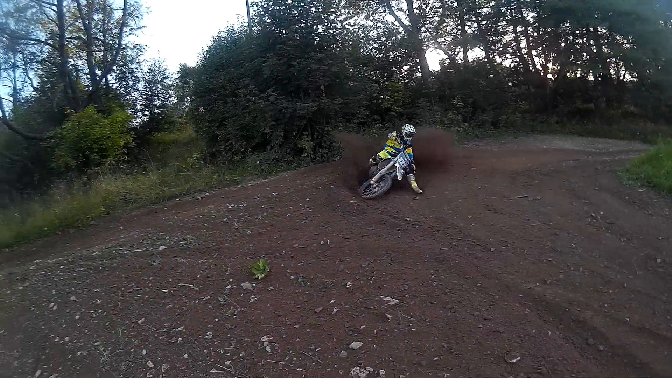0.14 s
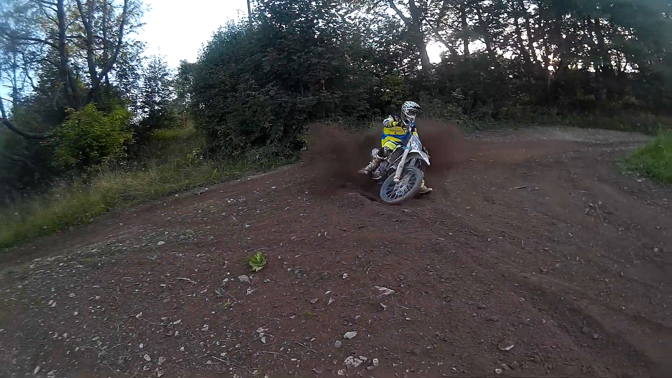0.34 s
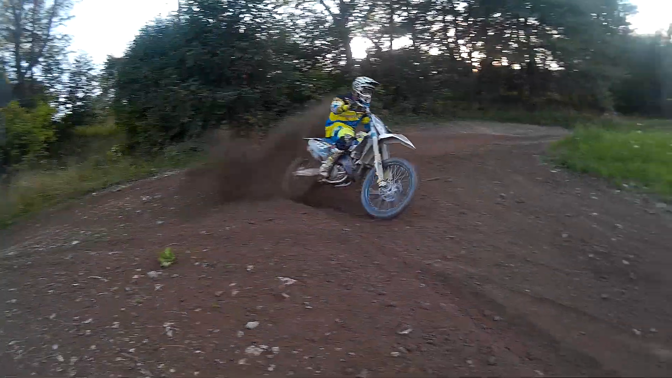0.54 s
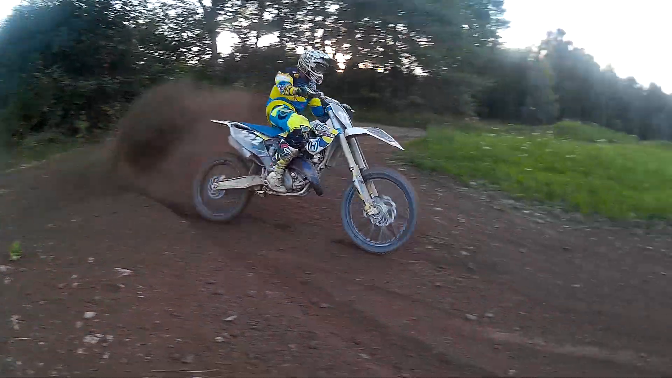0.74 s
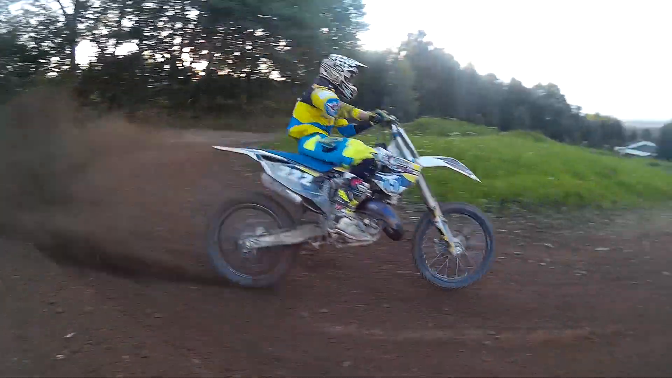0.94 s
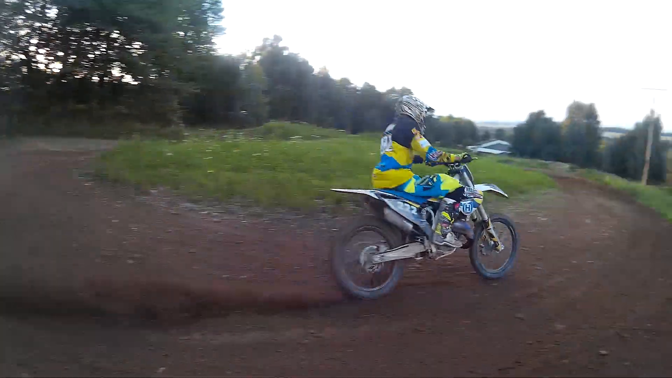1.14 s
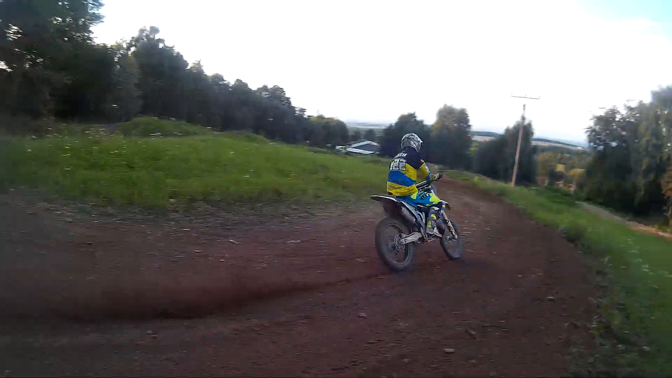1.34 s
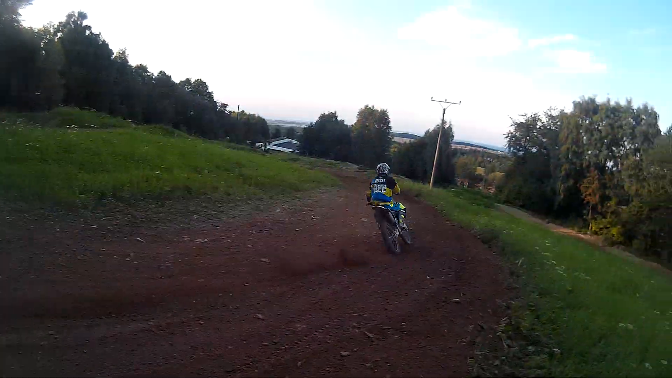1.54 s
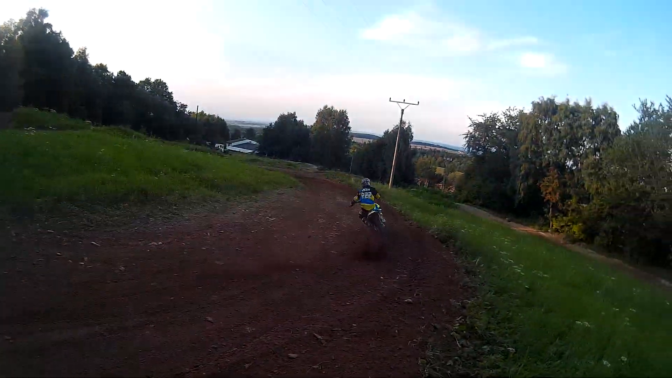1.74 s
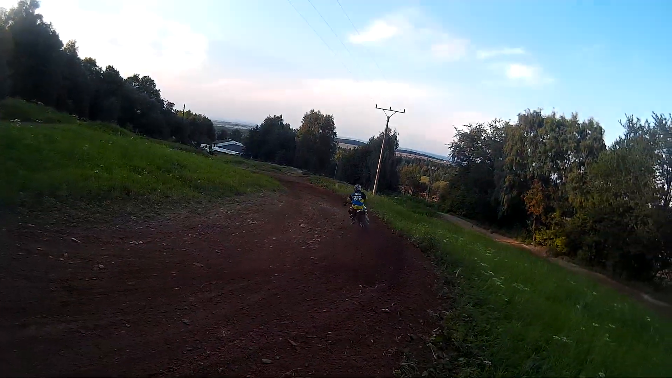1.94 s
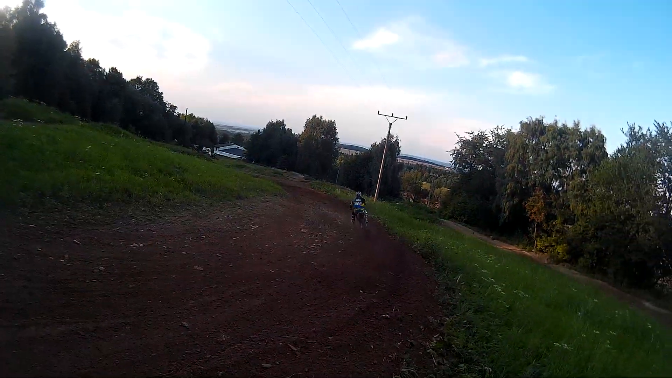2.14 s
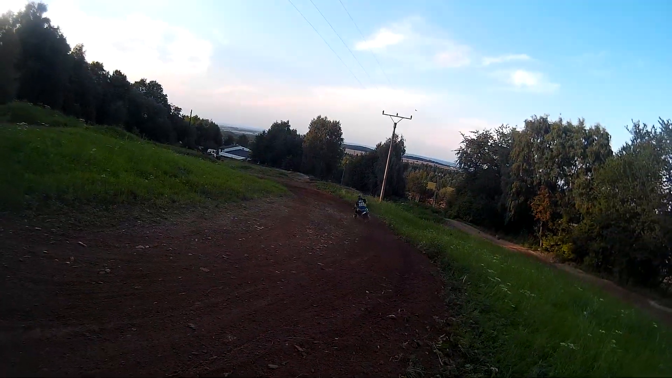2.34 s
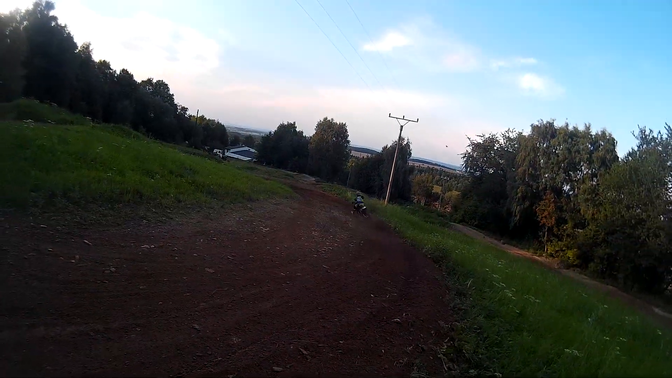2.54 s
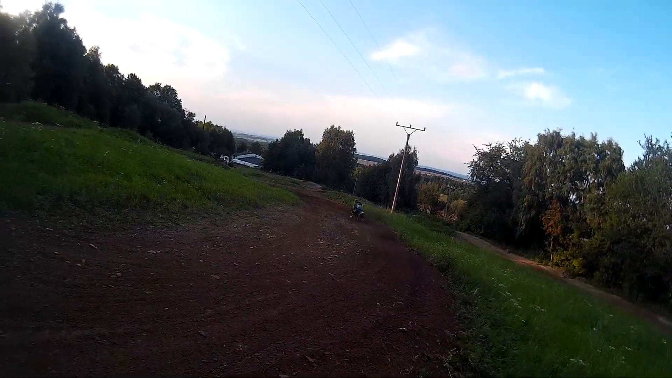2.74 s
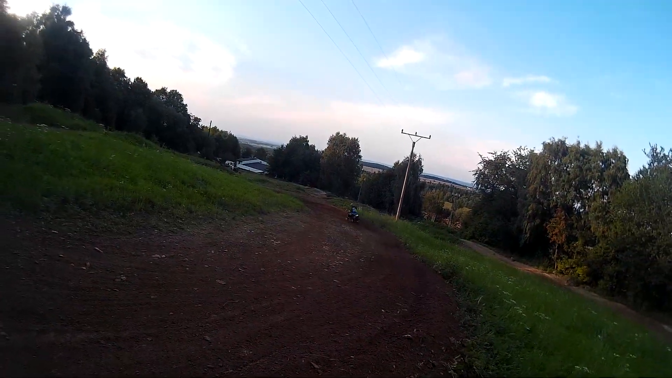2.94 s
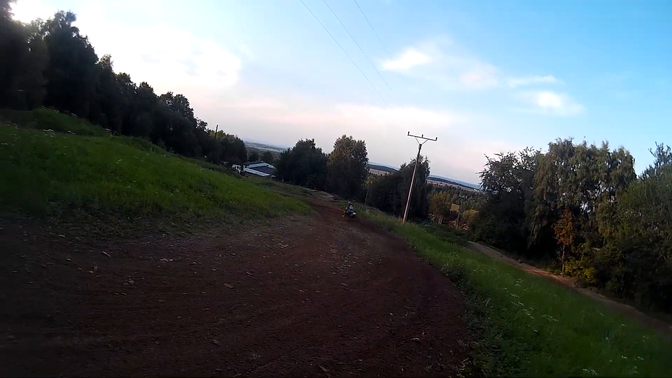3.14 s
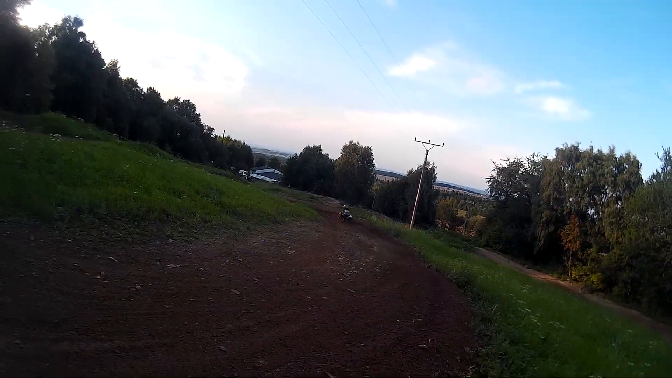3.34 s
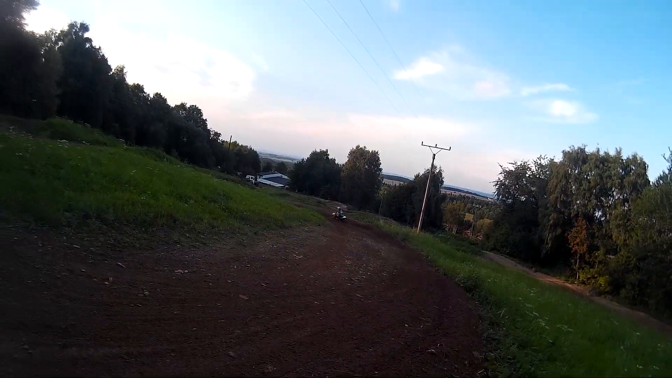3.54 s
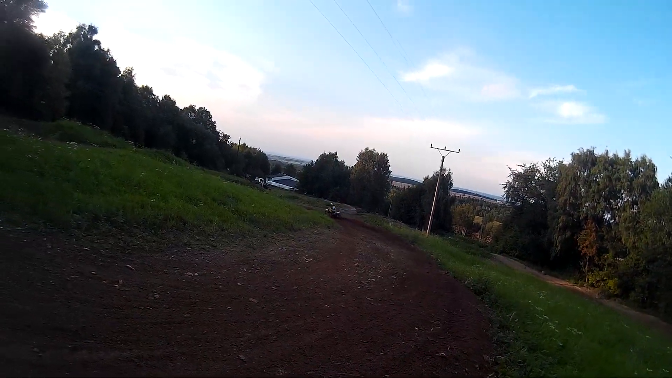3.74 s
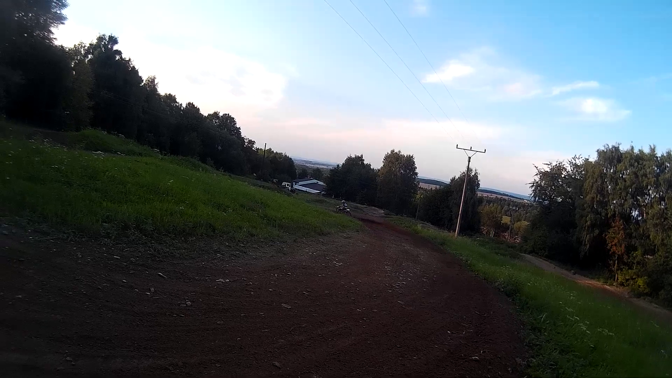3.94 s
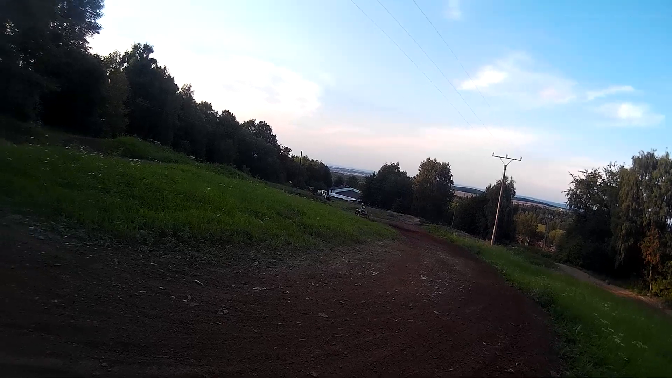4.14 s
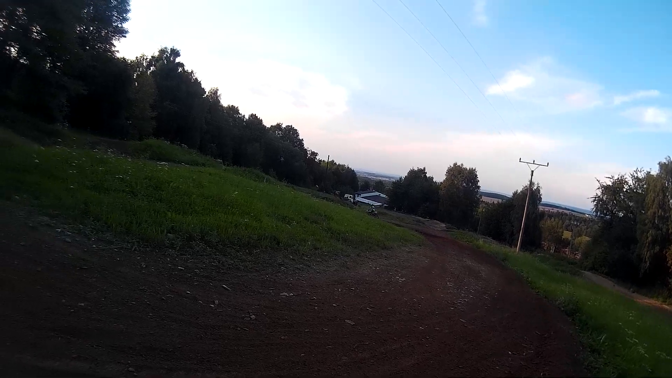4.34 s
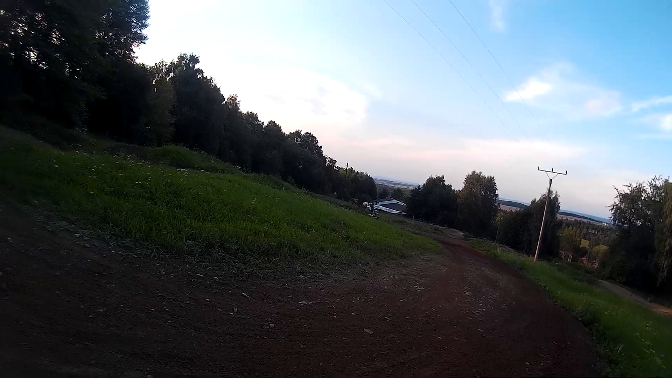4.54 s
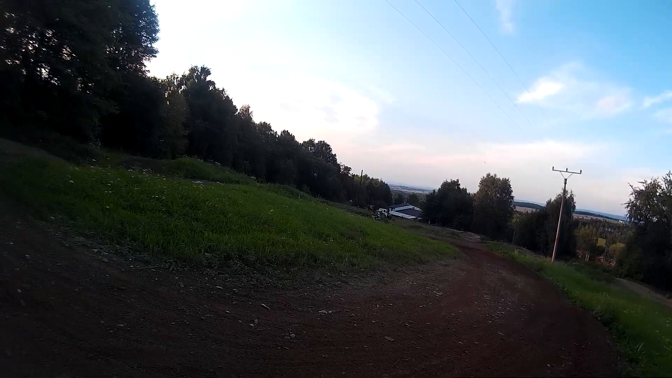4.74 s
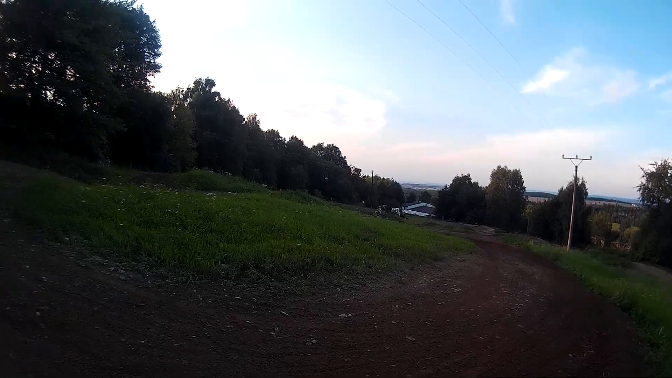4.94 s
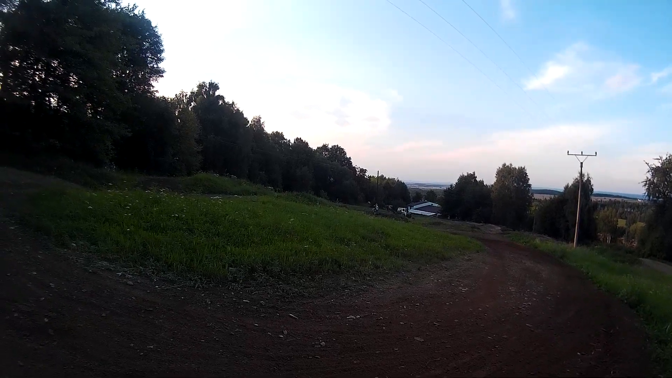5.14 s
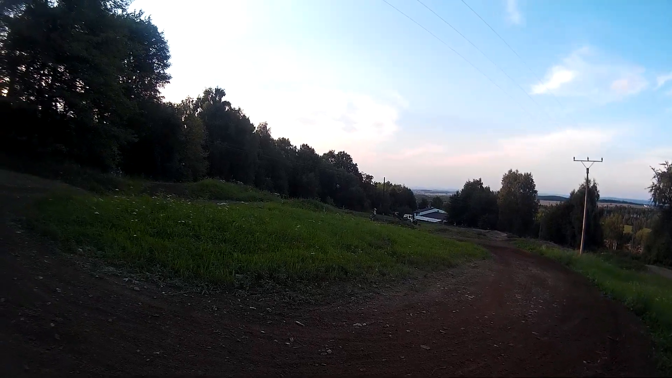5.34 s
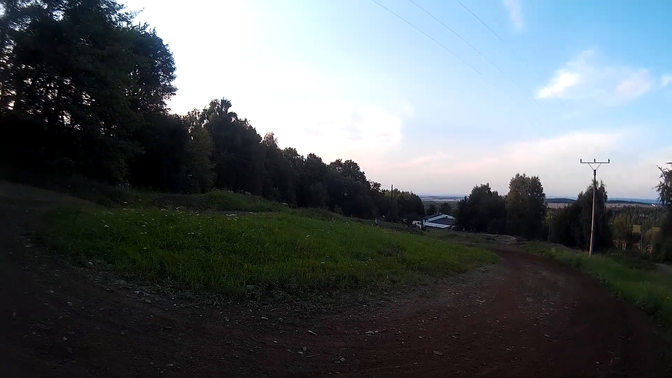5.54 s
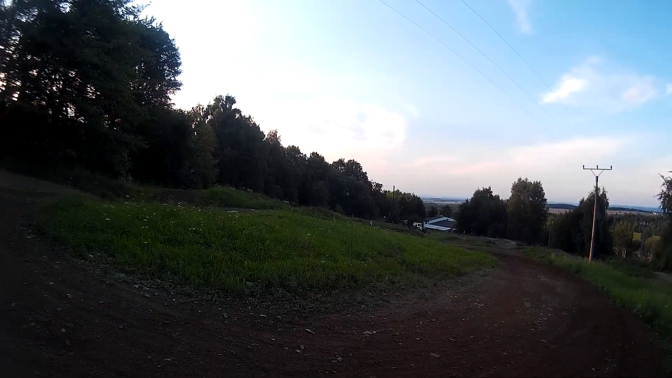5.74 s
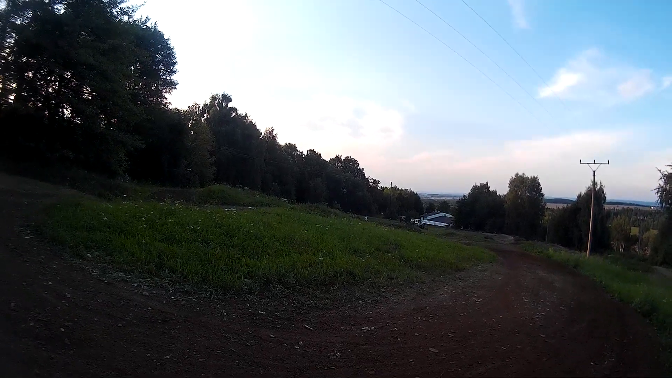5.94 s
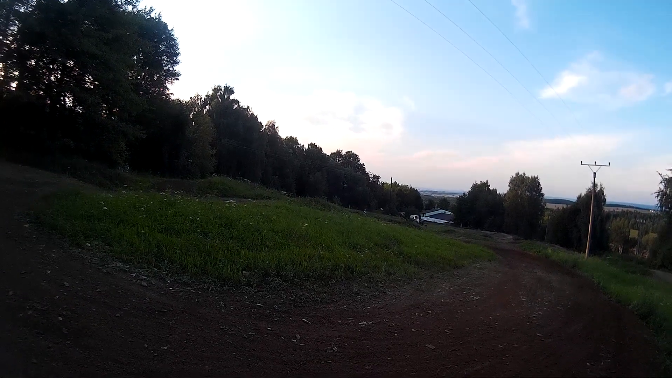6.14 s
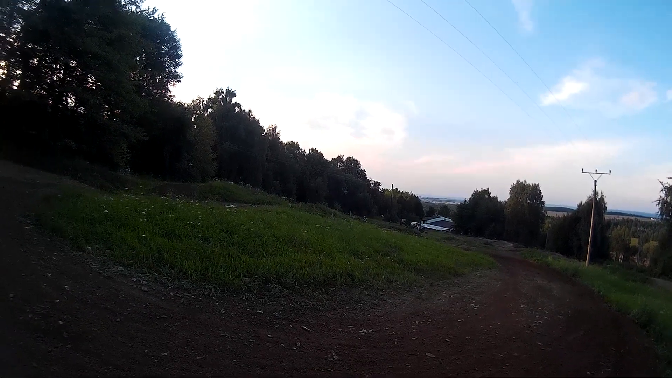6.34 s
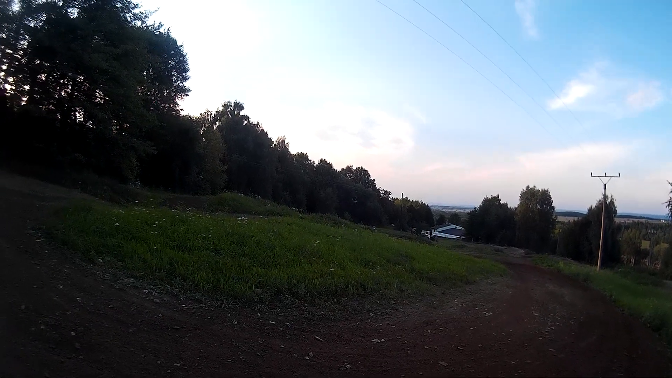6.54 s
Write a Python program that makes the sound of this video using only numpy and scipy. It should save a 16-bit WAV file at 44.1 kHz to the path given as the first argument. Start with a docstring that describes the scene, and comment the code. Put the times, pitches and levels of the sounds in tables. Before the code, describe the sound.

A single buzzing two-stroke bike powers through a corner a few metres from a fixed microphone. Tyres rumble and stones patter briefly. After the pass the ringing, nasal scream becomes a hoarser drone from behind, stuttering with quick throttle blips down the straight. It is abruptly muffled by the land, briefly resurfaces, and dies away into light wind, with a soft woodland echo.

```python
"""Motocross bike riding past

A two-stroke bike powers out of a dirt corner, passes close by and rides off downhill.
Each firing rings the expansion chamber (heard from the front) or the tailpipe (heard from behind),
and puffs of noise add rasping gas. Low tones drone along with the crank.
Noise bursts pop on the overrun, the tyres rumble and spray grit, trees answer and light wind rumbles."""
import sys
import numpy as np
from scipy import signal
from scipy.fft import rfft, irfft, next_fast_len
from scipy.io import wavfile
from scipy.ndimage import uniform_filter1d, map_coordinates

SR = 44100
rng = np.random.default_rng(int(sys.argv[2]) if len(sys.argv) > 2 else 0)


def generate_wav(sig):
    """Save sig (samples, or channels by samples) to the path in sys.argv[1] as 16-bit PCM at SR."""
    pcm = np.round(np.clip(np.atleast_2d(sig).T, -1, 1) * 32767).astype(np.int16)
    wavfile.write(sys.argv[1], SR, pcm)


N = 294588

# Crank speed through the corner and down the straight, before flutter: (time [s], firing rate [Hz])
CRANK_SPEED = [(0.0, 197.4), (0.12, 181.3), (0.25, 195.8), (0.39, 184.1), (0.49, 150.8), (0.54, 147),
               (0.62, 157.3), (0.7, 157.4), (0.74, 172.5), (0.79, 184.6), (0.84, 182.6), (0.92, 214.3),
               (0.97, 197.1), (1.15, 186.3), (1.22, 196), (1.27, 215), (1.32, 224.2), (1.38, 214.4),
               (1.42, 187.6), (1.51, 198.8), (1.53, 190), (1.61, 213), (1.67, 193.5), (1.71, 204.6),
               (1.93, 195.7), (2.0, 210.2), (2.35, 206.5), (2.39, 221.1), (2.48, 187.9), (2.62, 215.8),
               (2.74, 207.4), (2.77, 196.2), (2.89, 224.4), (2.99, 220.8), (3.04, 189), (3.12, 167.6),
               (3.16, 168.4), (3.18, 181.9), (3.31, 208.8), (3.39, 215.4), (3.44, 209.7), (3.48, 193.7),
               (3.52, 204.1), (3.77, 195.6), (3.84, 209.7), (3.95, 203.3), (4.0, 213), (4.04, 204.8),
               (4.22, 213.4), (4.25, 204.1), (4.32, 216.5), (4.4, 199.5), (4.45, 218.2), (4.48, 212.7)]
# Crank speed beyond the rise, before flutter: (time [s], firing rate [Hz])
FAR_CRANK_SPEED = [(4.57, 182.9), (4.844, 201.8), (5.37, 145.9), (5.448, 189.1), (5.528, 219.4),
                   (5.75, 210.9), (5.92, 166.8)]
# The flutter's share of the crank speed, and how many changes a second
FLUTTER, FLUTTER_PER_S = .003, 22

# The ride: (time [s], distance [m], front share [0-1], roughness [0-1], tyre rumble [dB], grit [dB])
RIDE = [(0, 13.1, 0.92, 0.5, -46, -37.5), (.7, 4.27, 0.97, 0.4, -51, -32.5),
        (1.25, 4.56, 0.21, 0.3, -46.5, -45.5), (1.7, 6.35, 0.11, 0.28, -51, -52),
        (2.5, 22.2, 0.2, 0.4, -48, -50), (4.1, 44.5, 0.04, 0.31, -48.5, -75),
        (4.9, 56, 0.36, 0.65, -67.5, -89), (6.6, 91, 0.06, 0.76, -70, -100)]
# The lie of the land hides the bike: (time [s], loss [dB])
HIDDEN_LOSS = [(4.3, 0), (4.7, 17), (4.82, 19.5), (4.97, 32), (5.3, 31), (5.37, 23), (5.49, 14), (5.83, 17),
               (6.1, 35)]

# Twists of the throttle:
# (fully open [s], starts to shut [s], time to open [s], engine load [dB], drone [dB])
THROTTLE_TWISTS = [(0, 0.353, .05, 1, 2), (0.42, .84, 0.62, 0, 1.5), (0.886, 0.931, 0.1, 1, -3.5),
                   (1.027, 1.271, 0.31, -2, -2), (1.41, 1.606, .032, 0.5, 0),
                   (1.621, 2.14, 0.09, -3.5, -1.5), (2.339, 2.375, 0.018, -6, 1.5),
                   (2.442, 2.611, 0.082, 0, 3.5), (2.808, 2.839, 0.029, -11, -4),
                   (2.887, 3, 0.13, -17.5, 1.5), (3.053, 3.058, 0.035, -5.5, -9),
                   (3.285, 3.355, .23, -0.5, 2.5), (3.516, 3.742, .06, -1.5, -1.5),
                   (3.81, 3.984, .12, 3, -0.5), (4.05, 4.29, .2, 1, 0.5), (4.425, 4.442, .04, -3.5, 1.5),
                   (4.663, 4.73, 0.072, -8.5, 0.5), (5.148, 5.2, .04, -14, -7), (5.479, 5.49, 0.14, 1, 4),
                   (5.55, 5.762, 0.049, -19.5, -3), (5.817, 5.87, 0.059, -10, 0.5)]
# Engine load with the throttle shut, and how fast the load falls to it
OVERRUN_DB, RELEASE_DB_PER_S = -19.5, 324
# The same two settings for the drone
DRONE_OVERRUN_DB, DRONE_RELEASE_DB_PER_S = -8.5, 107.5

# Base levels of the pipe's bark and the lowest drone tone, to which load and losses are added
BARK_DB, DRONE_DB = -12.5, -26.5
# Loss with each doubling of the distance
BARK_FADE_DB_PER_DOUBLING, DRONE_FADE_DB_PER_DOUBLING = 2.24, 1.72
# Below this firing rate the pipe is out of tune and the drone weakens
DRONE_HZ, DRONE_DB_PER_HZ = 182, 0.25
# Drone overtones before the load is added: (time [s], second order [dB], third order [dB])
OVERTONES = [(0, -38.5, -35), (.28, -49, -38), (.41, -36.5, -28.5), (.55, -36.5, -68), (.76, -50.5, -31.5),
             (.96, -22, -45), (1.13, -27.5, -23.5), (1.56, -35, -52.5), (2, -33, -38), (2.5, -29, -32),
             (2.8, -35, -40), (3.05, -31, -28), (3.4, -36, -56), (3.7, -37.5, -45), (4, -40.5, -68),
             (4.25, -45.5, -77), (5.8, -50.5, -49)]
# dB of the two overtones, and of rasp, per dB of load
SECOND_FOLLOWS, THIRD_FOLLOWS, RASP_FOLLOWS = .45, .8, .7
# Base level of the gas jet's rasp, before load, hiding and facing are added: (time [s], level [dB])
RASP_LEVEL = [(0, -25), (.32, -18.5), (.68, -22), (1.03, -22.5), (1.25, -25.5), (1.56, -30.5),
              (1.77, -45.5), (2.1, -37.5), (2.55, -35), (3.6, -38.5), (4.28, -35), (5.8, -36)]

# Expansion chamber resonances, heard from the front: (centre [Hz], width [Hz], relative level [dB])
CHAMBER = [(748, 20, -12), (959, 36, 3.5), (1158, 190, 2.5), (1320, 22, -6), (1522.7, 36, 17),
           (1901, 39, -2.5), (2073, 60, -5)]
# Cylinder and case resonances: (centre [Hz], width [Hz], relative level [dB])
CASING = [(2958, 50, 6), (3230, 15, 7), (3653, 48, 4), (3783, 38, 13.5), (4596, 23, 12), (4800, 32, -13),
          (5752, 43, 10), (5640, 46, -0.5), (6990, 170, 2)]
# Tailpipe resonances, heard from behind: (centre [Hz], width [Hz], relative level [dB])
TAILPIPE = [(774, 29, -12), (1008, 24, -3), (1215, 134, 1.5), (1502.5, 152, 4), (1643.3, 58.5, 6)]
# Silencer resonances: (centre [Hz], width [Hz], relative level [dB])
SILENCER = [(1874, 80, 11), (2126, 230, 8.5), (2316, 220, 7), (2815, 470, 1.5), (3340, 110, -2),
            (3560, 31, 3.5), (3833, 120, 6), (4450, 350, -6.5), (5730, 180, -15.5)]
# Pitches that the pipe cancels: (centre [Hz], width [Hz])
PIPE_GAPS = [(1840, 30), (3400, 200), (5120, 150)]
# Below GRASS_HZ the tailpipe's bark is lifted near by and lost to the grass with distance
GRASS_HZ, GRASS_DB_PER_DOUBLING, NEAR_LOWS_DB = 1000, 4, 14.5

# Tone colour of the hiss of gas and chain: (frequency [Hz], relative level [dB])
HISS_COLOUR = [(1500, -37.5), (3000, -0.5), (5100, 0), (6000, 8), (7200, -20), (7800, -7.5), (10500, -9),
               (12200, -1), (13000, -21.5), (15500, -27)]
# Tone colour of the tyre rumble: (frequency [Hz], relative level [dB])
RUMBLE_COLOUR = [(30, 0.5), (55, -7.5), (120, -9.5), (300, -7), (800, -14), (2000, -36.5)]
# Tone colour of the wind: (frequency [Hz], relative level [dB])
WIND_COLOUR = [(20, -10.5), (70, -17), (160, -22.5), (550, -38), (5400, -45), (15500, -44.5)]
# How long the trees answer: (frequency [Hz], time to fade by 60 dB [s])
TREE_FADE = [(1500, 0.7), (12000, 0.25)]

# Overrun pops: (time [s], strength before the crack and ring levels [dB])
OVERRUN_POPS = [(2.277, -21), (2.334, -32), (4.546, -28)]
# The shape that every pop shares; T60 is the time to fade by 60 dB
POP_RISE_S, POP_HOLD_S, POP_T60_S = .003, .007, .04

TOP_HZ = 15700  # nothing is kept from here up


def amp(db):
    """Turn decibels into a gain."""
    return 10 ** (np.asarray(db) / 20)


def unit(x):
    """Scale x to an rms (average strength) of 1."""
    return x / np.sqrt(np.mean(x ** 2) + 1e-20)


def steady(x, size=1500):
    """Even out x to a running rms of 1."""
    power = uniform_filter1d(uniform_filter1d(x * x, size), size)
    return x / np.sqrt(np.abs(power) + 1e-12)


def along(points, hz):
    """Read (Hz, value) points on a log frequency axis."""
    f, v = np.transpose(points)
    return np.interp(np.log(hz + 1), np.log(f + 1), v)


def curves(rows):
    """Give one value per sample for each column after the time."""
    s, *columns = np.transpose(rows)
    return [np.interp(np.arange(N) / SR, s, column) for column in columns]


def wobble(rate):
    """Draw a smooth random curve with the given number of knots a second."""
    knots = rng.standard_normal(int(N * rate / SR) + 4)
    return map_coordinates(knots, [np.arange(N) * rate / SR])


def filtered(x, response):
    """Multiply the spectrum of x by a response of frequency."""
    size = next_fast_len(N + SR // 2)
    hz = np.fft.rfftfreq(size, 1 / SR)
    return irfft(rfft(x, size) * response(hz), size)[:N]


def coloured(x, spectrum):
    """Give x the tone colour of a (Hz, dB) spectrum, at rms 1."""
    return unit(filtered(x, lambda hz: amp(along(spectrum, hz))))


def blend(a, b, share):
    """Mix a and b at equal power, with the given share of b."""
    share = np.clip(share, 0, 1)
    return np.sqrt(1 - share) * a + np.sqrt(share) * b


def ring(x, modes, low_hz, alternate=True):
    """Ring resonances weak below low_hz; without alternating signs, deep dips lie between them."""
    def body(hz):
        total = 0
        for k, (centre, width, db) in enumerate(modes):
            sign = (-1) ** k if alternate else 1
            damping = 1j * hz * width
            total = total + sign * amp(db) * damping / (centre * centre - hz * hz + damping)
        return total
    highpass = signal.butter(3, low_hz, 'high', fs=SR, output='sos')
    return signal.sosfilt(highpass, filtered(x, body))


def throttle(levels_db, overrun_db, release_db_per_s):
    """Raise a level from the overrun with each throttle twist, hold it and let it fall back."""
    t = np.arange(N) / SR
    twists = []
    for (start, end, rise_s, *_), db in zip(THROTTLE_TWISTS, levels_db):
        opening_db = overrun_db * np.maximum(start - t, 0) / rise_s
        closing_db = release_db_per_s * np.maximum(t - end, 0)
        twists.append(db + opening_db - closing_db)
    return np.maximum(np.max(twists, axis=0), overrun_db)


def drone(turns, rate_hz, load_db, doublings, shut):
    """The pressure swing at the tailpipe: three low tones that waver, the upper two more on the overrun."""
    *_, swings_db = np.transpose(THROTTLE_TWISTS)
    out_of_tune_db = DRONE_DB_PER_HZ * np.maximum(DRONE_HZ - rate_hz, 0)
    first_db = DRONE_DB + throttle(swings_db, DRONE_OVERRUN_DB, DRONE_RELEASE_DB_PER_S)
    first_db = first_db - out_of_tune_db - DRONE_FADE_DB_PER_DOUBLING * doublings
    second_db, third_db = curves(OVERTONES)
    second_db = second_db + SECOND_FOLLOWS * load_db
    third_db = third_db + THIRD_FOLLOWS * load_db
    tones = 0
    for k, db in enumerate([first_db, second_db, third_db]):
        waver_db = (.5 + 2 * k * shut) * wobble(50)
        swing = -np.sqrt(2) * np.cos(2 * np.pi * (k + 1) * turns)
        tones = tones + amp(db + waver_db) * swing
    return tones


def firings(turns, rough, scatter_s, scatter_db):
    """The firing pulses: one sharp pulse per crank turn, uneven in time and size."""
    at = np.interp(np.arange(1, int(turns[-1])), turns, np.arange(N))
    late, size = rng.standard_normal((len(at), 2)).T
    at = at + late * scatter_s * SR * rough[at.astype(int)]
    # a short windowed sinc places each pulse between samples
    taps = at.astype(int)[:, None] + np.arange(-7, 9)
    offset = taps - at[:, None]
    shape = np.sinc(offset) * np.cos(np.pi * offset / 16) ** 2
    pulses = shape * amp(scatter_db * size)[:, None]
    return unit(np.bincount(np.clip(taps, 0, N - 1).ravel(), pulses.ravel(), N))


def puffs(turns, decay, leak):
    """Turbulent gas that bursts out as the port opens and fades over the turn, above a steady leak."""
    strength = np.exp(-(turns % 1) / decay) + leak
    return unit(rng.standard_normal(N) * strength)


def notched(x):
    """Cut the gaps between the pipe's resonances out of x."""
    def gaps(hz):
        response = 1
        for centre, width in PIPE_GAPS:
            apart = centre * centre - hz * hz
            response = response * apart / (apart + 1j * hz * width)
        return response
    return filtered(x, gaps)


def over_grass(x, doublings):
    """Thin the lows over soft ground, more with each doubling of the distance; lift them near by."""
    lows = filtered(x, lambda hz: 1 / (1 + (hz / GRASS_HZ) ** 10))
    lows_gain = amp(NEAR_LOWS_DB - GRASS_DB_PER_DOUBLING * doublings)
    return x + (lows_gain - 1) * lows


def grounded(x, distance, heights_m2, bounce):
    """Add the bounce off the ground, whose extra path sweeps with distance and with the bumps."""
    extra_m = heights_m2 / np.maximum(distance, 2) * (1 + 0.13 * wobble(9))
    delay = extra_m / 343 * SR  # 343 m/s is the speed of sound
    return x + bounce * map_coordinates(x, [np.arange(N) - delay], order=3)


def engine():
    """Low tones drone, pulses ring the pipe, and the gas jet rasps in silencer and casing."""
    rate_hz, = curves(np.vstack([CRANK_SPEED, FAR_CRANK_SPEED]))
    distance, front, rough, _, _ = curves(RIDE)
    hidden_db, = curves(HIDDEN_LOSS)
    rasp_base_db, = curves(RASP_LEVEL)
    *_, loads_db, _ = np.transpose(THROTTLE_TWISTS)
    load_db = throttle(loads_db, OVERRUN_DB, RELEASE_DB_PER_S)
    doublings = np.log2(np.maximum(distance, 1))
    bark_db = BARK_DB + load_db - BARK_FADE_DB_PER_DOUBLING * doublings - hidden_db
    rasp_db = rasp_base_db + RASP_FOLLOWS * load_db - hidden_db

    # the rear wheel grips and slips, so the crank speed flutters
    turns = np.cumsum(rate_hz * (1 + FLUTTER * wobble(FLUTTER_PER_S))) / SR
    pulses = firings(turns, rough, scatter_s=.000025, scatter_db=.8)
    # near 1 on the overrun: more gas noise is mixed in
    shut = 1 / (1 + amp(2 * (load_db + 8 - .4 * hidden_db)))
    hum = amp(-hidden_db) * drone(turns, rate_hz, load_db, doublings, shut)
    blow = blend(pulses, puffs(turns, decay=.9, leak=.23), .5 * rough ** 2 + .067 * shut)
    gas = blend(pulses, puffs(turns, decay=.6, leak=.3), .05 + .3 * rough + .5 * shut)

    # heard from the front
    chamber = ring(blow, CHAMBER, low_hz=620.5, alternate=False)
    chamber = filtered(chamber, lambda hz: 1 / (1 + (hz / 2350) ** 20))
    casing = ring(gas, CASING, low_hz=2640, alternate=False)
    casing = filtered(casing, lambda hz: 1 / (1 + (hz / 7500) ** 10))
    # the cases ring a moment after the chamber
    casing = np.roll(casing, round(.0011 * SR))
    # heard from behind
    tailpipe = over_grass(notched(ring(blow, TAILPIPE, low_hz=740)), doublings)
    silencer = notched(ring(gas, SILENCER, low_hz=1740))

    # the bike turns its tail to the listener as it passes
    bark = blend(unit(tailpipe), unit(chamber), front)
    jet = blend(unit(silencer), unit(casing), front)
    # the ground bounce is stronger while the front is heard
    bounce = .12 + .4 * front
    bark = steady(grounded(bark, distance, heights_m2=3.22, bounce=bounce))
    jet = steady(grounded(jet, distance, heights_m2=3.22, bounce=bounce))
    hiss = coloured(puffs(turns, decay=.59, leak=1.2), HISS_COLOUR)

    bark_db = bark_db + 1.1 * wobble(25)
    jet_db = rasp_db + 3 - 8.6 * front
    # the hiss is lost further with distance
    hiss_db = rasp_db - 9 + 2 * front - .11 * distance
    return hum + amp(bark_db) * bark + amp(jet_db) * jet + amp(hiss_db) * hiss


def tyres():
    """Knobs rumble over the dirt as low noise and fling grit as random sharp clicks."""
    *_, rumble_db, grit_db = curves(RIDE)
    stones = (rng.random(N) < 2500 / SR) * rng.standard_normal(N)  # about 2500 a second
    grit = coloured(stones, [(300, -31.5), (2500, 0), (12300, -17), (15000, -24.5)])
    rumble = coloured(rng.standard_normal(N), RUMBLE_COLOUR)
    bumps_db = 1.2 * wobble(8)
    return amp(grit_db) * grit + amp(rumble_db + bumps_db) * rumble


def air():
    """Light wind and hiss made of wavering noise, with a faint thin whine from a sine."""
    whine = amp(-83) * np.sin(2 * np.pi * 8000 * np.arange(N) / SR)
    wind = coloured(rng.standard_normal(N), WIND_COLOUR)
    gusts_db = 1.2 * wobble(6)
    return amp(-59.5 + gusts_db) * wind + whine


def trees(x, delay_s):
    """The edge of the wood scatters a late, dull answer: noise whose treble fades soonest."""
    hz, t, noise = signal.stft(rng.standard_normal(SR * 3 // 4), SR, nperseg=256)
    fade = amp(-60 * t / along(TREE_FADE, hz)[:, None])
    tail = signal.istft(noise * fade, SR, nperseg=256)[1]
    late = np.pad(x, (int(delay_s * SR), 0))
    return signal.fftconvolve(late, tail / np.linalg.norm(tail))[:N]


def pops():
    """Unburnt fuel goes off in the hot pipe: a crack of gas that also rings the tailpipe."""
    t = np.arange(N) / SR
    blast = 0
    for start, db in OVERRUN_POPS:
        rise = np.clip((t - start) / POP_RISE_S, 0, 1)
        fade = amp(-60 * np.maximum(t - start - POP_HOLD_S, 0) / POP_T60_S)
        blast = blast + amp(db) * rise * fade
    gas = blast * rng.standard_normal(N)
    crack = filtered(gas, lambda hz: hz / (hz + 900) / (1 + (hz / 4300) ** 4))
    return amp(12.5) * ring(gas, TAILPIPE, low_hz=500) + amp(5) * crack


def scene():
    """Add up the bike, its answer from the trees, the tyres and the air."""
    bike = engine() + pops()
    answer = amp(-18.5) * trees(bike, delay_s=.02)
    return (bike + answer + tyres() + air())[None]


def record(dry):
    """Keep only what lies below the top frequency."""
    return np.array([filtered(x, lambda hz: hz < TOP_HZ) for x in dry])


dry = scene()
out = record(dry)
generate_wav(out)
```